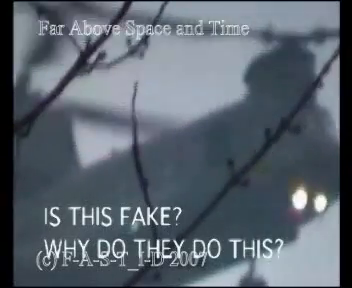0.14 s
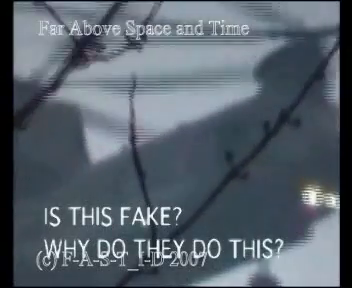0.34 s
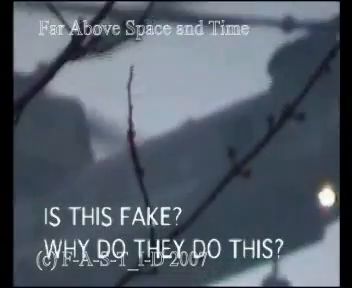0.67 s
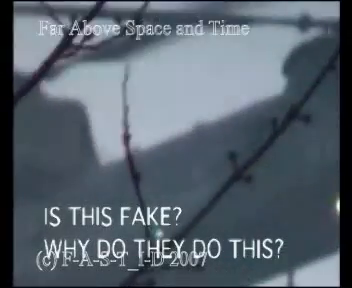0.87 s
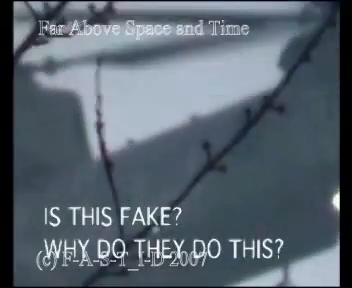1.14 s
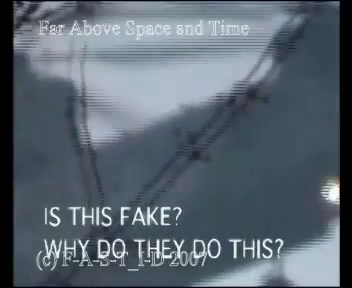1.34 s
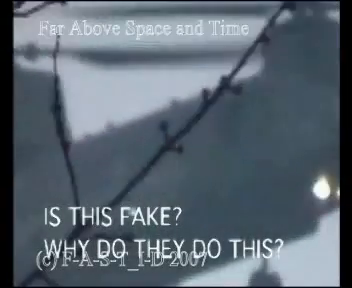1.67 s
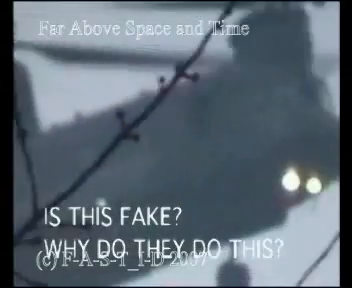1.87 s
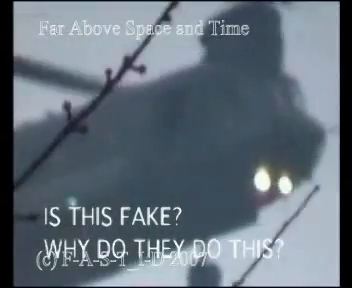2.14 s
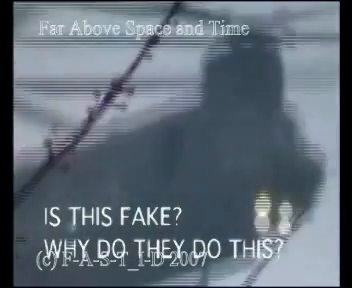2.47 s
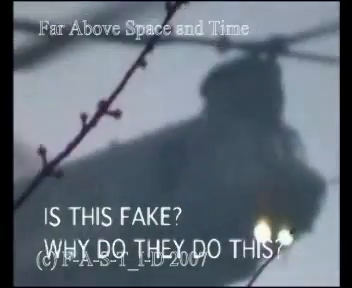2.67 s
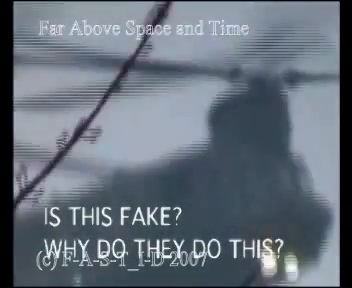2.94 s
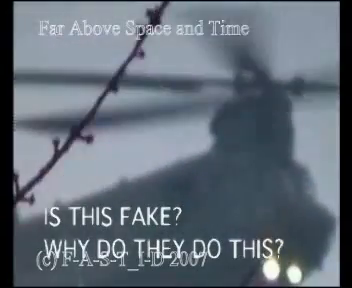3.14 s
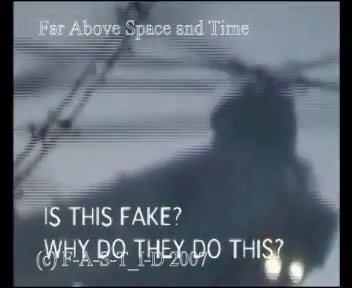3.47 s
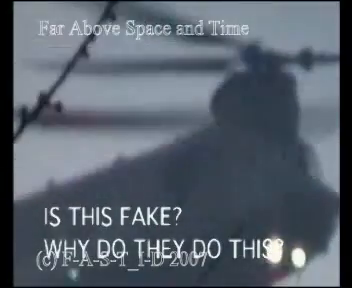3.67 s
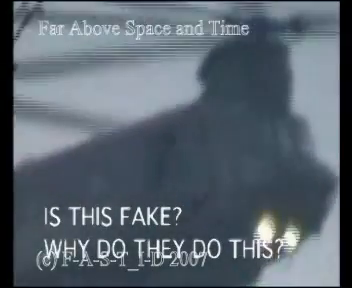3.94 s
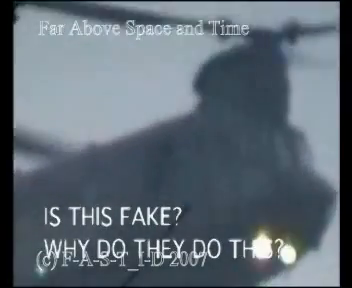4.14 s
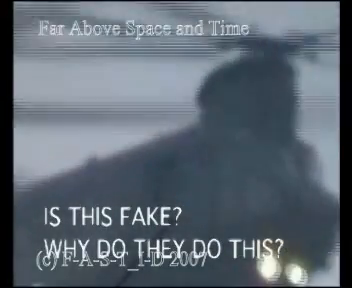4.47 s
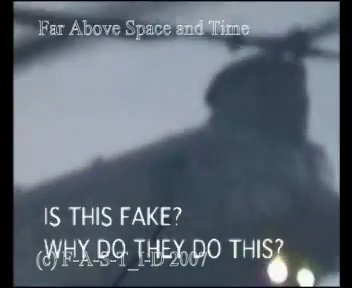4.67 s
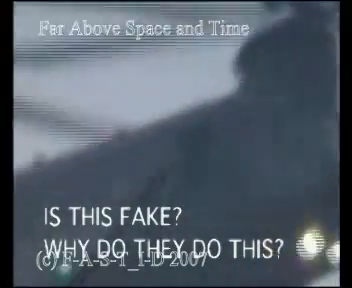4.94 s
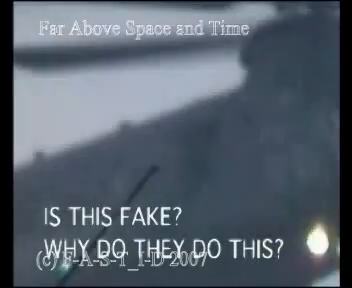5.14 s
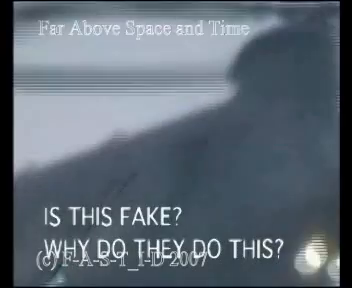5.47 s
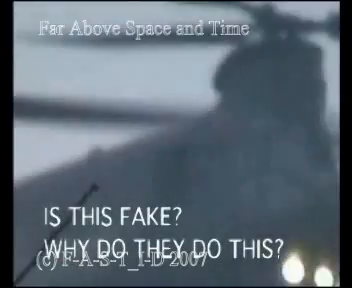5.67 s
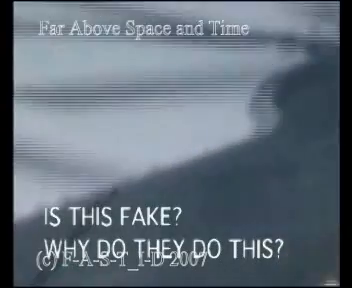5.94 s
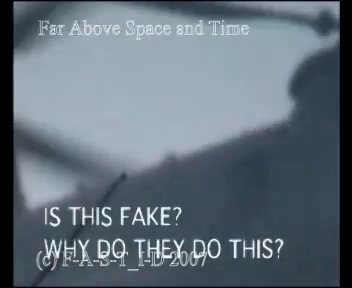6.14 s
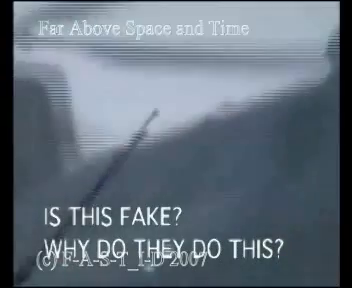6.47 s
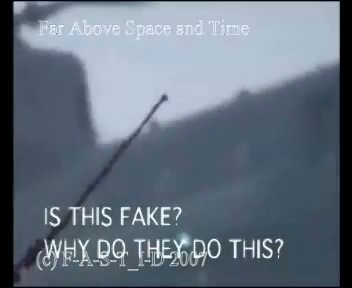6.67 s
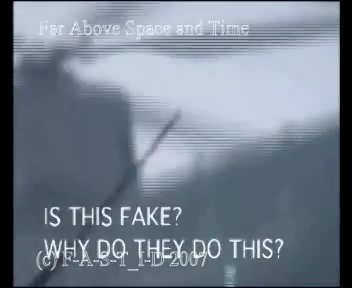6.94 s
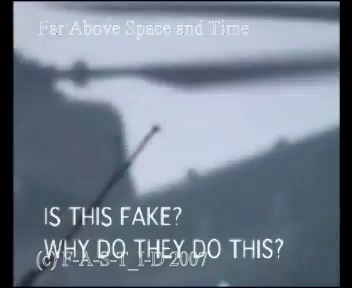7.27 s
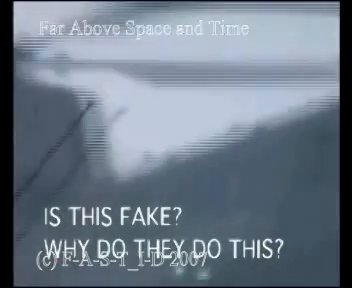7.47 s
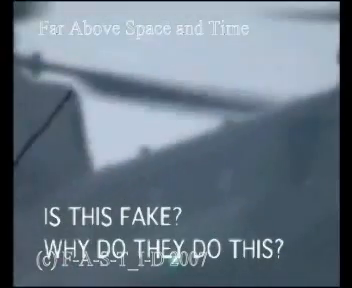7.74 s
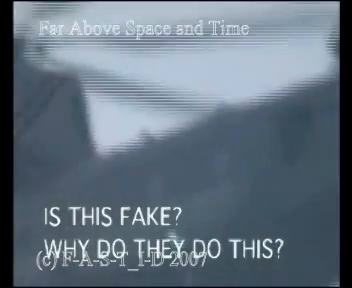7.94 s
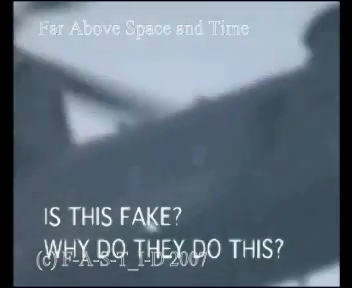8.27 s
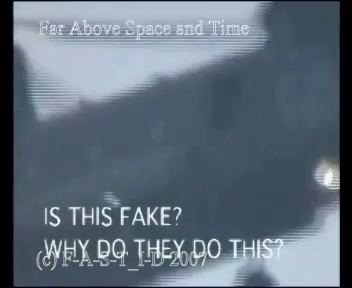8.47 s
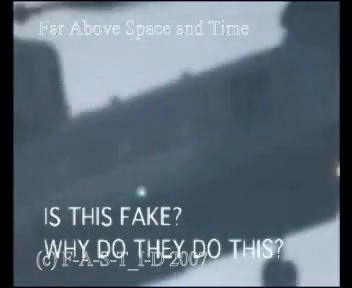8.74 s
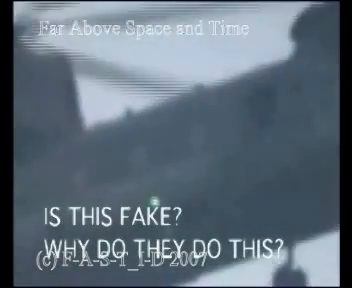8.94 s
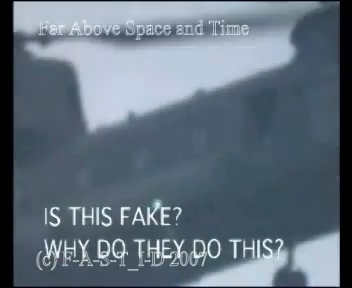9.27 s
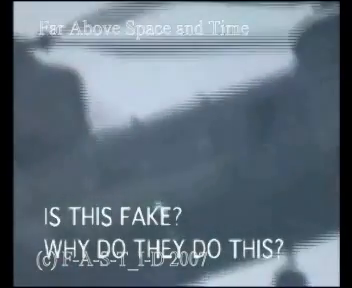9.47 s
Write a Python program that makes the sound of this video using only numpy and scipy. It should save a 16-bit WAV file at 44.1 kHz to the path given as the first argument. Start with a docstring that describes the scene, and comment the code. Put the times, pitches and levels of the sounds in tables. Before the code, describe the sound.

Fast, fluttering rotor beats crack through a thick midrange helicopter roar that surges and sags outdoors, over a low drone and wavering mechanical whine.

```python
"""A deep, beating roar is heard first: a heavy helicopter hangs low a few hundred metres off over open ground.
Noise bands and pressure pulses make its roar and blade slap, which swell and fade with the moving air.
Low rotor tones drone, narrow noise peaks make the gears whine, and short ground echoes comb roar and slap.
Filtered noise makes cracks, light wind, microphone hiss and a faint rustle at the hand-held camera;
the camera body ticks a few times with short ringing modes."""
import sys
import numpy as np
from scipy import signal
from scipy.fft import rfft, irfft
from scipy.io import wavfile
from scipy.ndimage import uniform_filter1d, minimum_filter1d

SR = 44100
rng = np.random.default_rng(int(sys.argv[2]) if len(sys.argv) > 2 else 0)


def pcm_store(signal):
    """Save signal as 16-bit PCM."""
    levels = np.round(np.clip(np.atleast_2d(signal), -1, 1) * 32767)
    wavfile.write(sys.argv[1], SR, levels.astype(np.int16).T)


N = 423360

# Echoes off the ground and nearby surfaces; a soft surface turns the sign.
# Each row: delay in seconds, share of the pressure, frequency in Hz above which the echo is dulled.
ECHO_PATHS = [(0.007026, 0.7, 740), (0.00712, -0.086, 130), (0.00447, -0.18, 990), (.00941, 0.24, 1700)]


def from_db(db):
    """Turn decibels into gain."""
    return 10 ** (np.asarray(db) / 20)


def rms_one(x):
    """Scale a sound to an average strength (rms) of 1."""
    return x / np.sqrt(np.mean(x ** 2) + 1e-20)


def in_time(rows):
    """Draw straight lines between the rows of a table: one value per sample for each column after the time."""
    s, *columns = np.transpose(rows)
    return [np.interp(np.arange(N) / SR, s, column) for column in columns]


def drift(rate):
    """Slow random wandering of spread 1, changing about rate times a second."""
    # worked out at every 40th sample, with the first 2000 values dropped while the filter settles
    r = np.exp(-80 * np.pi * rate / SR)
    slow = signal.lfilter([1], [1, -2 * r, r * r], rng.standard_normal(N // 40 + 2002))[2000:]
    return np.interp(np.arange(N) / 40, np.arange(len(slow)), rms_one(slow))


def resonance(x, hz, width_hz):
    """Let a narrow peak of frequencies through, with gain 1 on top (a two-pole filter)."""
    r = np.exp(-np.pi * width_hz / SR)
    top = [(1 - r * r) / 2, 0, (r * r - 1) / 2]
    return signal.lfilter(top, [1, -2 * r * np.cos(2 * np.pi * hz / SR), r * r], x)


def humps(at_s, half_s, db):
    """Sum of bell-shaped level changes in dB, one for each moment."""
    t = np.arange(0, N + 40, 40) / SR
    bells = np.exp(-((t[:, None] - at_s) / half_s) ** 2) @ db
    return np.interp(np.arange(N) / SR, t, bells)


def blade_beat():
    """Each passing blade sends a pressure pulse and a fast-dying noise burst, heard again off the ground."""
    # Each row: time in seconds, place of the slap in the blade cycle in turns,
    # slap above the roar in dB and its ground echo above the roar in dB, both before weighting by band.
    slaps = [(0, 0.31, 8.5, 4.5), (.45, 0.28, 12.5, 5), (.8, 0.3, 4.5, 5.5), (1.3, 0.57, 3, -1.5),
             (2, 1, 2, 1), (3, 0.51, 4.5, 0.5), (4, 0.63, 5.5, 3), (5, .57, 8, 1.5), (6, 0.57, 5.5, 6.5),
             (7.3, .56, 9.5, 7), (8, 0.64, 2, 5.5), (8.8, 0.63, 5, -3), (9.6, 0.95, 0, 1.5)]
    blades, blade_hz = 5, 32.6
    pass_spread = .28  # each slap is stronger or weaker by up to this share of its dB
    pulse_per_db = .8
    slap_s, echo_ring_s, echo_delay_s = .0055, 0.0034, .0078  # the two dB rises fade with the first two times
    blade_spread_db, loud_blade_turns = .55, .7

    place, slap_db, echo_db = in_time(slaps)
    turns = blade_hz * np.arange(N) / SR - place + 1
    passage = turns.astype(int)
    scatter = rng.uniform(-1, 1, passage.max() + 2)[passage]
    strength_db = slap_db * (1 + pass_spread * scatter)
    pulses = pulse_per_db * strength_db * np.diff(passage, prepend=passage[0])

    burst = np.exp(-(turns % 1) / (slap_s * blade_hz))
    late = np.exp(-((turns - echo_delay_s * blade_hz) % 1) / (echo_ring_s * blade_hz))

    # the blades differ in loudness, a pattern that repeats with each full turn of the rotor
    angle = 2 * np.pi * (turns / blades - loud_blade_turns)
    blade_db = blade_spread_db * (np.cos(angle) + 0.77 * np.cos(2 * angle - 1.0))
    return pulses, strength_db * burst + blade_db, echo_db * late


def roar(tilts_db, patchy_db):
    """Noise of air whirling off the blades, in third-octave bands beaten by the slap and mottled by gusts."""
    # Overall tone colour. Each row: frequency in Hz, level per Hz in dB before the final scaling.
    colour = [(50, -34), (80, -27), (130, -10), (220, -3.5), (320, -1), (550, -1.5), (850, -3.5),
              (1250, -7), (1550, -10), (1800, -15.5), (2200, -16.5), (2700, -22.5), (3600, -25.5),
              (5200, -34.5), (8200, -48.5)]
    # Frequencies in Hz where the tilts act in full: bass, low middle, middle, high middle, upper middle, treble.
    tilt_hz = [130, 270, 550, 1050, 1900, 3800]

    pulses, beat_db, echo_db = blade_beat()
    out = 0
    together = drift(11.0)  # mottling shared by all bands
    edges = 56 * 2 ** np.arange(0, 7.4, 1 / 3)
    white = rng.standard_normal((2, N))
    for k, (low, high) in enumerate(zip(edges, edges[1:])):
        hz = np.sqrt(low * high)
        # how much of the slap and of its echo this band shows
        sharp = np.interp(np.log(hz), np.log([250, 1300, 5000]), [.45, 1.15, .6])
        echoed = np.interp(np.log(hz), np.log([250, 700, 2200, 4000]), [.3, .8, 1.3, .3])

        tilt_db = 0
        for peak, db in zip(np.eye(6), tilts_db):
            tilt_db = tilt_db + np.interp(np.log(hz), np.log(tilt_hz), peak) * db

        source = white[k % 2] * from_db(sharp * beat_db + echoed * echo_db) + sharp * pulses
        band_filter = signal.butter(2, [low, high], "band", fs=SR, output="sos")
        band = signal.sosfilt(band_filter, source)
        mottle_db = patchy_db * (.5 * together + drift(4.3))
        out = out + band * from_db(tilt_db + mottle_db)

    colour_hz, colour_db = np.transpose(colour)
    all_hz = np.arange(1, N // 2 + 2) * SR / N
    gain = from_db(np.interp(np.log(all_hz), np.log(colour_hz), colour_db))
    return rms_one(irfft(rfft(out) * gain, N))


def ground(x):
    """Direct sound plus dull short echoes; moving air makes their paths waver, blurring the comb in the treble."""
    wander_s = .00012
    out, now = x.copy(), np.arange(N)
    for delay_s, share, dull_hz in ECHO_PATHS:
        late = np.interp(now - SR * (delay_s + wander_s * drift(2.5)), now, x)
        out += share * signal.lfilter(*signal.butter(1, dull_hz, fs=SR), late)
    return rms_one(out)


def surges():
    """Brief rises and dips in the level of the roar, in dB."""
    # Each row: time in seconds, level change in dB.
    moments = [(.795, 0.5), (.888, 1), (4.94, 2.5), (5.012, 2.5), (5.465, 0), (6.632, 3.5), (6.99, 2.5),
               (7.143, 1), (7.455, -2), (9.562, 4)]
    at_s, db = np.transpose(moments)
    return humps(at_s, 0.0084, db)  # half length in seconds


def gears(upper_middle_db, treble_db):
    """Tones of meshing gear teeth, smeared by turbulent air: noise through narrow peaks, swelling with the roar."""
    # Each row: frequency in Hz, width of one filter pass in Hz, level against the swell in dB.
    tones = [(1168, 14, 3), (2294, 16, -10), (2336, 32, -5.5), (3512, 36, -3.5), (4672, 60, -13)]
    # Moments when the whine changes level. Each row: middle in seconds, half length in seconds,
    # change in dB of the main lower tones, of the thin side tone, of the upper tones.
    flares = [(.9, 0.17, 7, 2, 2), (1.15, 0.049, 4, 0, 2), (1.45, 0.09, 9.5, 1, 2), (1.85, .2, 10, 7, 4),
              (2.6, .15, 3, 7, 2), (2.83, .12, 4, 6, 10), (2.983, 0.083, 6.5, 5, 2), (4.75, 0.27, 2, 8, 3),
              (5.2, 0.13, 10, 1, 3), (7.843, 0.2, 3, 9, 6), (8.64, 0.15, 11.5, -2, 4),
              (9.197, 0.26, 2, -6, 8.1)]
    lower_offset_db, upper_offset_db = -14, -10.5  # against the roar's upper middle and its treble
    flicker_db = 2.0

    at_s, half_s, lower_gain_db, side_gain_db, upper_gain_db = np.transpose(flares)
    lower_db = upper_middle_db + lower_offset_db + humps(at_s, half_s, lower_gain_db)
    side_db = upper_middle_db + lower_offset_db + humps(at_s, half_s, side_gain_db)
    upper_db = treble_db + upper_offset_db + humps(at_s, half_s, upper_gain_db)

    out = 0
    swells_db = [lower_db, side_db, lower_db, upper_db, upper_db]
    for (hz, width_hz, level_db), swell_db in zip(tones, swells_db):
        once = resonance(rng.standard_normal(N), hz, width_hz)
        tone = rms_one(resonance(once, hz, width_hz))
        out = out + tone * from_db(level_db + swell_db + flicker_db * drift(5.7))
    return out


def drone(swell_db):
    """Steady load on the blades: near-clean multiples of the blade rate, the upper ones wavering with the air."""
    # Each row: time in seconds, then rms level in dB of multiples 1, 2 and 4 of the blade rate.
    main_levels = [(0, -50, -36, -32.5), (.8, -40.5, -42, -36), (1.4, -46.5, -58, -38),
                   (3.3, -54, -53.5, -35), (4, -46.5, -43, -38), (5.2, -50, -63, -36),
                   (5.7, -41.5, -56.5, -40.5), (7.699, -45, -46, -42.5), (8.15, -41, -44, -52),
                   (9.6, -44, -45, -42)]
    # Weaker tones. Each row: multiple of the blade rate, peak level in dB before swell and wavering.
    overtones = [(3, -48), (5, -41), (6, -45.5), (8, -40), (9, -40.5)]
    drone_hz = 32.57

    phase = 2 * np.pi * drone_hz * np.arange(N) / SR + 0.27 * drift(0.29)
    out = 0
    for k, db in zip([1, 2, 4], in_time(main_levels)):
        out = out + np.sqrt(2) * from_db(db) * np.sin(k * phase + k)
    for k, level_db in overtones:
        gain = from_db(level_db + .5 * swell_db + 4.6 * drift(1.3))
        out = out + gain * np.sin(k * phase + 1.4 * drift(0.88))
    return out


def wind():
    """Lumpy low noise of air on the microphone, with a few stronger puffs."""
    # Each row: middle of the puff in seconds, rise above the wind in dB.
    puffs = [(.05, 12), (3.28, 11), (3.4, 8), (4.28, 7), (5.02, 3), (6.05, 6), (8.121, 12), (9.58, 12)]
    wind_db, lumps_db, puff_half_s = -49, 2, 0.1  # middle level, spread of the lumps, half length of a puff

    band = signal.butter(2, [30, 85], "band", fs=SR, output="sos")
    low = signal.sosfilt(band, rng.standard_normal(N))
    at_s, puff_db = np.transpose(puffs)
    level_db = wind_db + lumps_db * drift(3.7) + humps(at_s, puff_half_s, puff_db)
    return rms_one(low) * from_db(level_db)


def hiss():
    """The microphone's own steady noise: random noise with the lower tones removed."""
    high_pass = signal.butter(2, 4500, "high", fs=SR)
    return from_db(-56.5) * rms_one(signal.lfilter(*high_pass, rng.standard_normal(N)))


def cracks():
    """The sharpest blade slaps crack: very short bursts of band-limited noise, each echoed off the ground."""
    # Each row: start in seconds, peak level in dB before the echo and the treble cut.
    moments = [(0.0094, -20), (0.0403, -15), (0.1012, -20), (0.1625, -24), (0.194, -21), (0.2239, -27),
               (0.2554, -23), (0.2848, -22), (0.3172, -22), (0.3456, -28), (0.3794, -22), (0.4075, -19),
               (0.4409, -24), (0.4693, -27), (0.4988, -27), (0.5634, -25), (0.7487, -23), (0.7751, -25),
               (4.3106, -19), (4.5281, -25), (4.5545, -23), (4.804, -23), (4.8658, -25), (5.2425, -23),
               (5.3004, -23), (7.011, -22), (7.0723, -19), (7.1337, -22), (7.1646, -19), (7.1964, -18),
               (7.2245, -14), (7.2574, -21), (7.2868, -16), (7.3158, -24), (7.3502, -19), (7.3864, -31),
               (7.4774, -25), (7.5374, -26), (7.6894, -23)]
    low_hz, high_hz, fade_s, echo_db = 1500, 4500, .0007, -9

    out = np.zeros(N)
    fade = np.exp(-np.arange(200) / (fade_s * SR))
    band = signal.butter(2, [low_hz, high_hz], "band", fs=SR, output="sos")
    bursts = signal.sosfilt(band, fade * rng.standard_normal((len(moments), 200)))
    for (s, db), burst in zip(moments, bursts):
        out[round(s * SR):][:200] += from_db(db) * burst / np.abs(burst).max()
    return out + from_db(echo_db) * np.roll(out, round(ECHO_PATHS[0][0] * SR))


def rustle():
    """Faint bright crackle at the camera: short clusters of tiny random grains."""
    # Each row: middle in seconds, half length in seconds, level in dB.
    clusters = [(.87, .04, -62), (1.05, .025, -66), (1.3, 0.044, -63), (1.41, 0.051, -53)]
    grains_per_s = 2500

    t = np.arange(N) / SR
    present = rng.random(N) < grains_per_s / SR
    grains = present * rng.standard_normal(N) * from_db(3 * drift(25))
    band = signal.butter(3, [6500, 9300], "band", fs=SR, output="sos")
    bright = signal.sosfilt(band, grains)
    envelope = sum(from_db(db) * np.exp(-((t - s) / half_s) ** 4) for s, half_s, db in clusters)
    return rms_one(bright) * envelope


def ticks():
    """Each tick touches the plastic camera body twice and rings its short modes with new strengths."""
    # Each row: time in seconds, strength in dB, to which each mode adds its own level.
    touches = [(1.8585, -33), (1.8735, -21), (1.888, -34), (2.0333, -36), (2.0477, -26.5), (2.1123, -39),
               (2.3927, -38), (2.407, -25), (2.4225, -38), (5.2245, -50), (9.4794, -46), (9.5486, -29)]
    # Ringing modes of the body. Each row: frequency in Hz, relative level in dB, time to fade by 60 dB in seconds.
    modes = [(4800, -11, .003), (6100, 0.5, .004), (6900, 10.5, 0.0031), (8250, 12, 0.005),
             (8950, 6, 0.0032), (10700, -2, 0.003), (10900, 12.5, 0.0063)]
    second_touch_s, second_touch_db = 0.00073, -5

    at = np.array([round(s * SR) for s, db in touches])
    strength_db = np.array(touches)[:, 1]
    spread_db = rng.normal(0, 3, (len(at), 2, len(modes)))
    out = np.zeros(N)
    for k, (hz, level_db, t60) in enumerate(modes):
        clicks = np.full(N, 1e-18)  # tiny floor instead of exact silence
        mode_db = strength_db + level_db - 13.0
        second_db = mode_db + second_touch_db + spread_db[:, 1, k]
        clicks[at] = from_db(mode_db + spread_db[:, 0, k])
        clicks[at + round(second_touch_s * SR)] = (-1) ** k * from_db(second_db)
        r, w = from_db(-60 / (t60 * SR)), 2 * np.pi * hz / SR
        out += signal.lfilter([0, np.sin(w)], [1, -2 * r * np.cos(w), r * r], clicks)
    return out


def scene():
    """Aircraft through air and ground echo, then the sounds at the microphone and camera."""
    # Roar carried by the moving air. Each row: time in seconds, level of the middle in dB, then
    # low middle, high middle, upper middle and treble, each in dB against the middle.
    carried = [(0.0, -18, -7.5, -1, -3.5, -18), (0.05, -14.5, -5.5, -5, -12.5, -20.5),
               (0.29, -17.5, -6, -4, -7.5, -16.5), (0.4, -15.5, -7.5, -5, -10.5, -22),
               (0.45, -23, 0.5, 4, -5, -12), (0.56, -17.5, -12.5, -2.5, -14.5, -20),
               (0.72, -24, -3.5, 0, -6, -13.5), (0.8, -20.5, -5.5, -7, -11, -19.5),
               (0.91, -24, -1.5, -1, -7, -15), (1.47, -20.5, -5.5, -2.5, -7, -19.5),
               (1.65, -18.5, -5, -3, -8.5, -20.5), (2.2, -21.5, -4, -2.5, -8, -19.5),
               (2.45, -20.5, -5.5, 0, -3.5, -20), (2.7, -18.5, -5.5, -0.5, -4, -16),
               (3.45, -22.5, -6.5, -6, -7.5, -21), (4.22, -23, -5.5, -1, -8, -16.5),
               (4.4, -20.5, -6, 1.5, -8, -13.5), (4.62, -18.5, -5, -1.5, -8, -19),
               (4.87, -17.5, -7, 1, -7.5, -18.5), (5.03, -12.5, -12.5, -8, -11.5, -23),
               (5.06, -20, -7, 0.5, -5.5, -15), (5.2, -17.5, -1.5, -2.5, -11, -17),
               (5.27, -20, -3, -2, -8, -15.5), (5.36, -21, -2.5, -2.5, -7, -15.5),
               (5.69, -25.5, -3.5, 0.5, -7.5, -18), (5.96, -27.5, -1.5, -0.5, -3, -15),
               (6.3, -24.5, -4, 3, -4.5, -17.5), (6.71, -19.5, -5.5, -4, -12.5, -19.5),
               (7.0, -17, -7.5, -2.5, -9, -19.5), (7.25, -16.5, -7.5, -2, -5.5, -18),
               (7.81, -17.5, -6.5, 0.5, -6, -16.5), (8.21, -19, -6, -5.5, -11, -22),
               (8.42, -20.5, -6, 1.5, -5, -19), (8.64, -16.5, -9.5, -5, -11.5, -20),
               (9.41, -23, -1.5, -1, -5, -18), (9.6, -26, -0.5, 1.5, -6, -17.5)]
    bass_follows = 0.1  # share of the middle's swell that reaches the bass
    whole_above_middle_db = 4.5

    middle_db, low_db, high_db, upper_db, treble_db = in_time(carried)
    swell_db = middle_db - middle_db.mean()
    tilts_db = [(bass_follows - 1) * swell_db]
    for db in (low_db, np.zeros(N), high_db, upper_db, treble_db):
        tilts_db.append(db - db.mean())

    roar_db = middle_db + whole_above_middle_db + surges()
    blades = ground(roar(tilts_db, patchy_db=0.84)) * from_db(roar_db)
    aircraft = blades + gears(middle_db + upper_db, middle_db + treble_db)

    # a steep treble cut, at full strength from this many Hz up
    treble_cut = signal.cheby2(10, 50, 1.169 * 7650, fs=SR, output="sos")
    steady = signal.sosfilt(treble_cut, aircraft + cracks() + hiss())
    return (steady + drone(swell_db) + wind() + ticks() + rustle())[None]


def record(dry):
    """A fast limiter dips the gain around the highest peaks, tips that slip past it clip; the top is cut."""
    ceiling, cut_hz = .71, 12100  # the treble cut is at full strength from cut_hz up
    allowed = np.minimum(1, ceiling / (np.abs(dry) + 1e-9))
    lowest = minimum_filter1d(allowed, size=41)
    gain = uniform_filter1d(uniform_filter1d(lowest, size=23), size=23)
    clipped = np.clip(gain * dry, -ceiling, ceiling)
    return signal.sosfilt(signal.cheby2(12, 70, cut_hz, fs=SR, output="sos"), clipped)


dry = scene()
out = record(dry)
pcm_store(out)
```